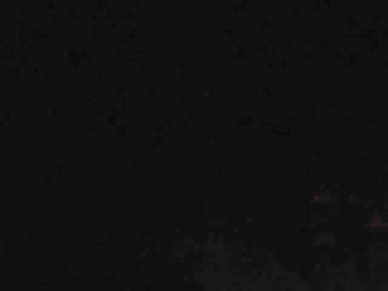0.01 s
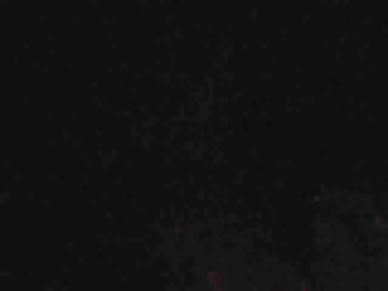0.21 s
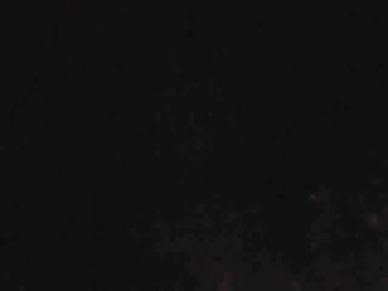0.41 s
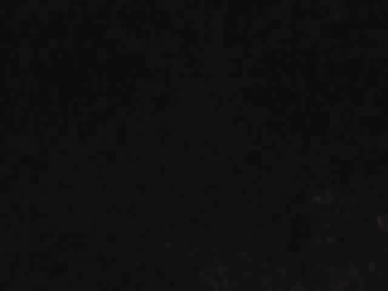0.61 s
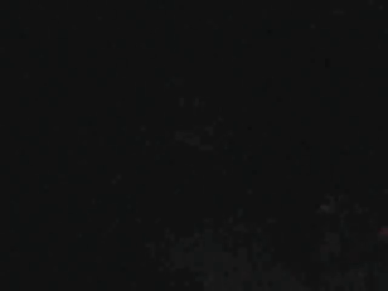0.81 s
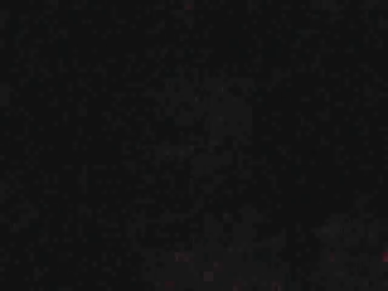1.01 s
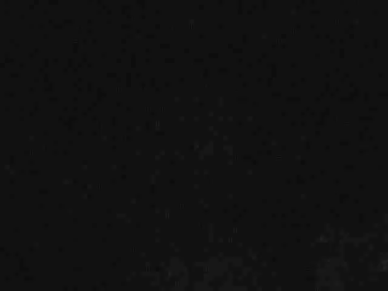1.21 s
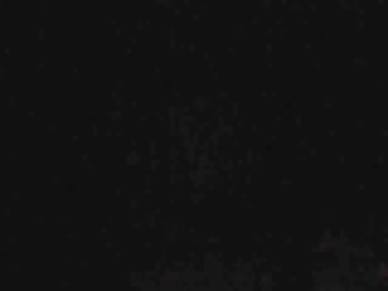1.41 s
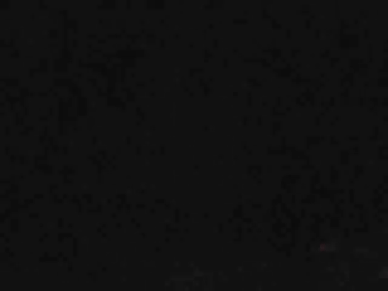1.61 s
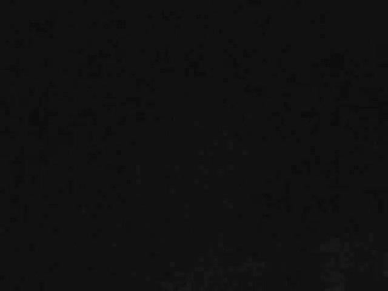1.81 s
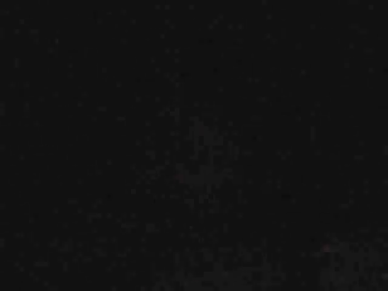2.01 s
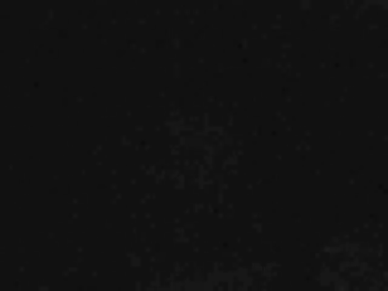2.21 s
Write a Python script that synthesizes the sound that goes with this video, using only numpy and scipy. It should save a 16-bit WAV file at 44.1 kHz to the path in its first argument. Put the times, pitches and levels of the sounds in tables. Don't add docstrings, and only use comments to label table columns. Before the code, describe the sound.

Raspy animal screech sinking to a moan, then a rough bark and thin squeal, echoing off walls.

```python
import sys
import numpy as np
from scipy import signal
from scipy.fft import rfft, irfft
from scipy.io import wavfile

SR = 44100
rng = np.random.default_rng(int(sys.argv[2]) if len(sys.argv) > 2 else 0)


def transcribe(u):
    v = np.clip(np.atleast_2d(u).T, -1, 1)
    q = np.round(v * 32767).astype(np.int16)
    wavfile.write(sys.argv[1], SR, q)


def field_ratio(decibels):
    return 10 ** (np.asarray(decibels, dtype=float) / 20)


N = 99225
LEAD = SR // 2
TIME = np.arange(N + LEAD) / SR - LEAD / SR


def at_hz(points, hz):
    p = np.array(points)
    return np.interp(np.log(hz), np.log(p[:, 0]), p[:, 1])


def wander(rate_hz, size):
    low_pass = signal.butter(4, rate_hz, fs=SR, output="sos")
    x = signal.sosfilt(low_pass, rng.standard_normal(size + SR))[SR:]
    return x / x.std()


# (frequency [Hz], relative level [dB per Hz])
NIGHT_SPECTRUM = [(18, -17.5), (58, 0.5), (205, -10), (270, -6.5), (420, -16), (2300, -19.5), (4700, -34),
                  (7000, -68)]


def night():
    level_db, patchy_db = -45.5, -0.5
    hz = np.maximum(np.arange(N // 2 + 1) * SR / N, 10)
    air = irfft(rfft(rng.standard_normal(N)) * field_ratio(at_hz(NIGHT_SPECTRUM, hz)), N)
    return field_ratio(level_db + patchy_db * wander(2.2, N)) * air / air.std()


def twig_tick():
    start_s, level_db, ring_hz, t60_s = 0.0115, -20, 2940, 0.0038
    since = np.clip(np.arange(N) / SR - start_s, 0, None)
    decay = field_ratio(level_db - 60 * since / t60_s)
    return decay * np.sin(2 * np.pi * ring_hz * since) * np.minimum(since / 0.00045, 1)


# (frequency [Hz], decay time T60 [s])
WALL_DECAY = [(700, 0.72), (1500, 0.98), (3000, 0.64), (6000, 0.66)]


def yard(x):
    level_db, build_s = -2, 0.015
    far_db, far_stretch = -11, 2.2
    t = np.arange(2 * SR) / SR
    answer = np.zeros(len(t))
    edges = 500 * 2 ** np.arange(0, 4.1, 0.5)
    for low, high in zip(edges, edges[1:]):
        band_pass = signal.butter(2, [low, high], "band", fs=SR, output="sos")
        band = signal.sosfilt(band_pass, rng.standard_normal(len(t)))
        t60 = at_hz(WALL_DECAY, np.sqrt(low * high))
        decay = field_ratio(-60 * t / t60) + field_ratio(far_db - 60 * t / (t60 * far_stretch))
        answer += band * decay / band.std() * np.sqrt(high - low)
    answer *= 1 - np.exp(-t / build_s)
    answer /= np.sqrt(np.sum(answer ** 2) * SR / 2 / 7500)
    return field_ratio(level_db) * signal.fftconvolve(x, answer)[:len(x)]


# (time [s], pitch [Hz], level [dB],
# length [s], glide [Hz])
BREATH_CATCHES = [
    (.209, 3680, -38, 0.028, 109.5),
    (1.19, 3680, -32, 0.058, -100),
    (1.647, 3340, -38.5, 0.047, 14),
    (1.11, 875, -40.5, .09, 1.5),
    (2.02, 1055, -38, .07, -340),
    (1.446, 428, -50.5, 0.22, -10),
    (1.7, 990, -43.5, .12, -28),
    (1.999, 1176, -47, 0.18, -22.5),
]


def catches():
    out = np.zeros(len(TIME))
    for start, hz, db, length, glide_hz in BREATH_CATCHES:
        since = np.clip(TIME - start, 0, length)
        pitch = (hz + glide_hz * since / length) * (1 + 0.03 * wander(300, len(TIME)))
        tone = np.sin(2 * np.pi * np.cumsum(pitch) / SR)
        out += field_ratio(db) * tone * np.minimum(since / 0.002, 1) * (1 - (since / length) ** 2)
    return out


def call(rows, throat):
    jitter, jitter_hz = 0.027, 142
    waver, waver_hz = 0.004, 16
    rasp_hz, shimmer_db = 240, 2
    flutter_ratio, flutter_from_hz = 0.55, 1970
    clean_below_hz, rough_top = 2590, 1.2
    s, *columns = np.transpose(rows)
    size = len(TIME)
    on = (TIME > s[0]) & (TIME < s[-1])
    hz, db, rough, side_db, mouth, tilt_db = [np.interp(TIME[on], s, c) for c in columns]
    rasp, rasp_side = wander(rasp_hz, size), wander(rasp_hz, size)
    shake = jitter * rough * wander(jitter_hz, size)[on] + waver * wander(waver_hz, size)[on]
    phase = 2 * np.pi * np.cumsum(hz * (1 + shake)) / SR
    wave, power = 0, 0
    for order in range(1, 14):
        for side in (-1, 0, 1):
            ratio = order + side * flutter_ratio
            partial_hz = ratio * hz
            partial_db = at_hz(throat, order * hz / mouth) + tilt_db * np.log2(partial_hz / 2000)
            gain = field_ratio(partial_db + side_db * abs(side)) * (partial_hz < 7600)
            gain = gain * np.minimum(partial_hz / flutter_from_hz, 1) ** (2 * abs(side))
            height = np.minimum((partial_hz / clean_below_hz) ** 2.3, rough_top)
            noisy = np.clip(rough * height, 0, 1)
            own = np.roll(rasp, rng.integers(N))[on]
            own_side = np.roll(rasp_side, rng.integers(N))[on]
            turn = ratio * phase + rng.uniform(0, 2 * np.pi)
            in_step = np.sqrt(1 - noisy) + np.sqrt(noisy / 2) * own
            across = np.sqrt(noisy / 2) * own_side
            wave = wave + gain * (in_step * np.sin(turn) + across * np.cos(turn))
            power = power + gain ** 2 / 2
    level = field_ratio(db + shimmer_db * wander(20, size)[on])
    out = np.zeros(size)
    out[on] = wave / np.sqrt(power) * level * signal.windows.tukey(on.sum(), 400 / on.sum())
    return out


# (frequency [Hz], level [dB])
EARLIER_VOICE = [
    (-.3, 562, -48, 0.66, -24.5, 1, 0.12),
    (-.1, 536.8, -47.5, 0.24, -17.5, 0.94, 0.13),
]
SCREAM_VOICE = [
    (.213, 571, -44, 0.4, -8.5, 0.94, 7.5),
    (0.257, 564.8, -24.5, 0.4, -11, 0.93, 4),
    (0.419, 564, -22, 0.21, -12.5, 0.98, 0.7),
    (.54, 556.7, -23, 0.16, -23.5, 1.045, 0.5),
    (0.629, 545.7, -23, 0, -0.5, 0.92, -1),
]
OPEN_THROAT = [(560, -28), (1130, -9.5), (1700, -8), (2270, -7), (2850, 1.5), (3400, -16), (4500, -12),
               (7000, -38.5)]


def scream():
    return call(EARLIER_VOICE, OPEN_THROAT) + call(SCREAM_VOICE, OPEN_THROAT)


FALL_VOICE = [
    (.62, 548, -23.5, 0.53, -19.5, 1.04, .1),
    (.74, 522, -25, 0.3, -5.5, 0.96, .1),
    (.8, 494.7, -24, 0.32, -5, 1.015, -1.2),
    (.86, 478.4, -26.5, 0.36, -7, 0.95, .5),
    (.93, 442, -32.5, 0.52, -10.5, 1.045, .1),
    (1.0, 443.7, -41.5, 0.52, -4, 0.87, -1),
    (1.08, 440, -43, 0.72, -2, 1.45, -1),
    (1.13, 435, -38.5, 0.85, 1, 1.07, -1),
    (1.19, 435, -39.5, 0.42, -12.5, 1.03, -1),
]
FALL_THROAT_SHAPE = [(480, -29.5), (1000, -2.5), (1300, -16.5), (1650, 2.5), (2100, -5.5), (2450, -1.5),
                     (4000, -8), (7000, -35.5)]


def falling_moan():
    return call(FALL_VOICE, FALL_THROAT_SHAPE)


BARK_VOICE = [
    (1.186, 495, -38, 0.88, -13, 1.01, 0.5),
    (1.235, 523.6, -24, 0.97, 0.5, 1.094, 1),
    (1.275, 484.5, -25.5, 1, -8.5, 0.87, 5),
    (1.31, 426.3, -41.5, 1, -30.5, 0.8, 0),
    (1.41, 359, -43.5, 0.53, -21.5, 0.65, -20),
]
BARK_THROAT_SHAPE = [(500, -31.5), (1020, -1.5), (1450, -13), (1950, -1), (2500, -7.5), (3100, -2),
                     (4200, -7), (7000, -39.5)]


def bark():
    return call(BARK_VOICE, BARK_THROAT_SHAPE)


CRY_VOICE = [
    (1.66, 600.7, -37.5, 0.9, -25.5, 1.06, .1),
    (1.705, 586.6, -30.5, 0.43, -7.5, 1.05, .1),
    (1.758, 581, -34, .2, -18, 1.01, .1),
    (1.805, 550, -39, 0.63, -26, 1.1, .1),
]
CRY_THROAT_SHAPE = [(600, -46.5), (1150, -22), (1780, -4), (2350, -8), (2900, 1.5), (3500, -7.5),
                    (4900, -18), (7000, -42)]


def cry():
    return call(CRY_VOICE, CRY_THROAT_SHAPE)


SQUEAL_VOICE = [
    (1.81, 1733, -36.5, .15, -7, 1.03, -6),
    (1.835, 1698, -31.5, 0.26, -18.5, 1.15, -2.5),
    (1.865, 1632, -30.5, 0.11, -18.5, 0.98, -4.5),
    (1.89, 1521, -32.5, 0.56, -7.5, 1.21, -11),
    (1.91, 1295, -31.5, 0.84, -1, 0.7, 5.5),
    (1.935, 1165, -41, 0.63, -2, 0.64, -7),
]
SQUEAL_THROAT_SHAPE = [(1200, -24), (1700, -8.5), (3300, 3), (5000, -13.5), (6800, -35.5)]


def squeal():
    return call(SQUEAL_VOICE, SQUEAL_THROAT_SHAPE)


def scene():
    voice = scream() + falling_moan() + bark() + cry() + squeal()
    high_pass = signal.butter(4, 844, "high", fs=SR, output="sos")
    animal = signal.sosfilt(high_pass, voice) + catches()
    heard = (animal + yard(animal))[LEAD:]
    return (heard + twig_tick() + night())[None]


def roll_off(x):
    return signal.sosfilt(signal.butter(12, 7230, fs=SR, output="sos"), x)


def record(dry):
    offset, hiss_db = 0.015, -71.5
    low_pass = signal.cheby2(18, 75, 7310, fs=SR, output="sos")
    x = signal.sosfilt(low_pass, dry)
    mix = x + offset + field_ratio(hiss_db) * rng.standard_normal(x.shape)
    return roll_off(mix)


dry = scene()
out = record(dry)
transcribe(out)
```